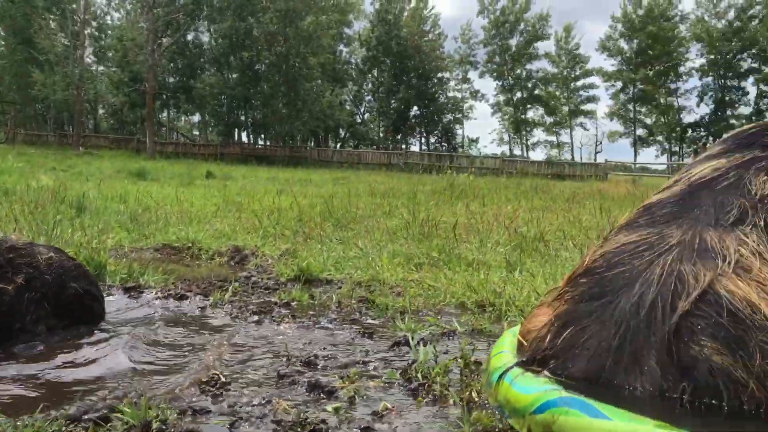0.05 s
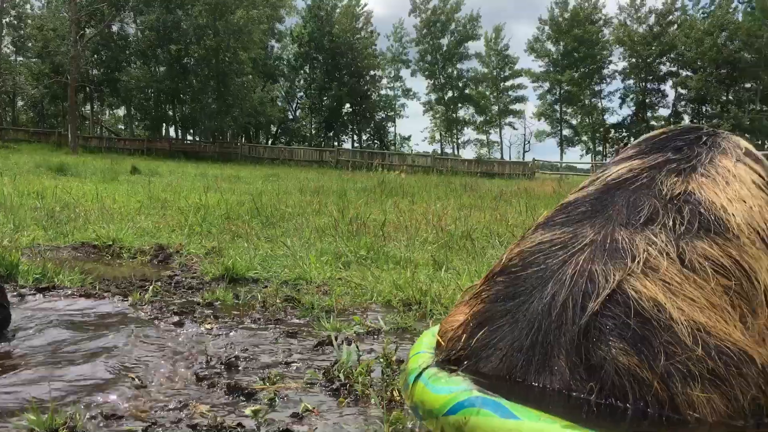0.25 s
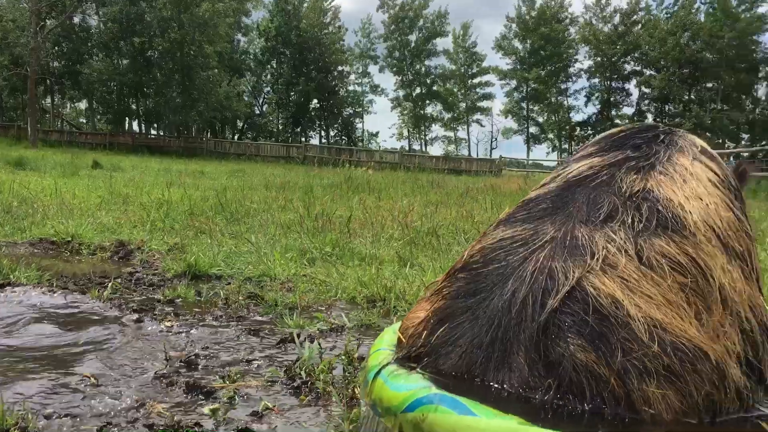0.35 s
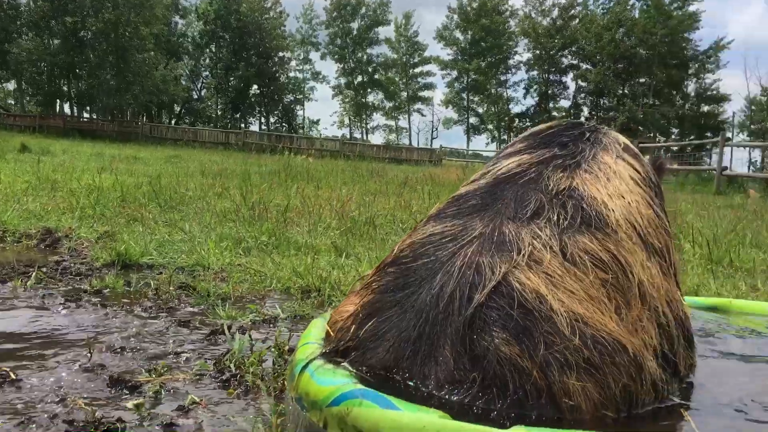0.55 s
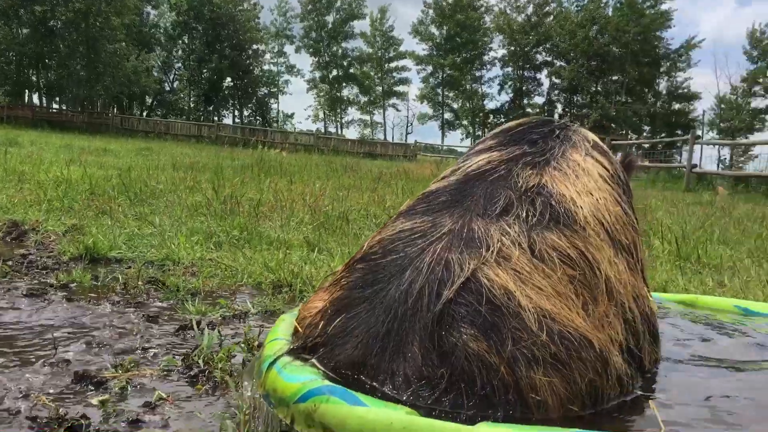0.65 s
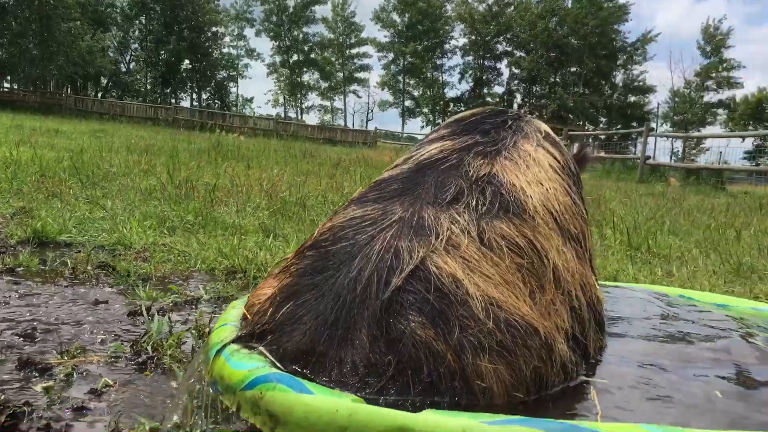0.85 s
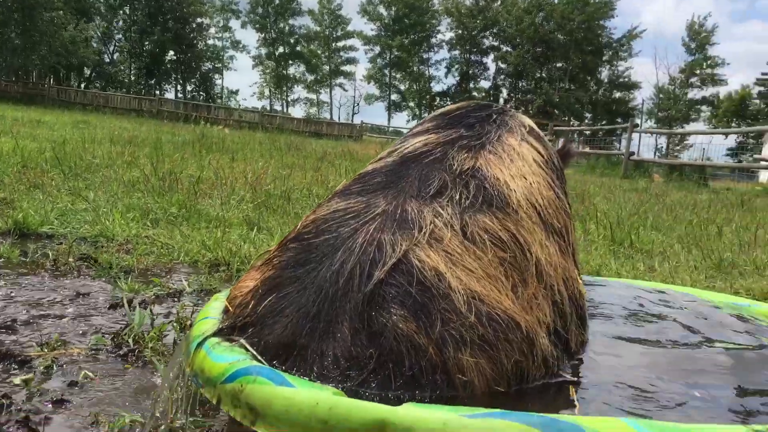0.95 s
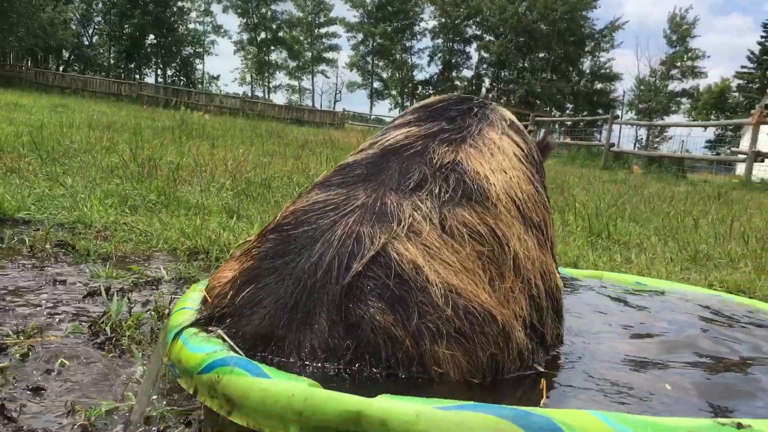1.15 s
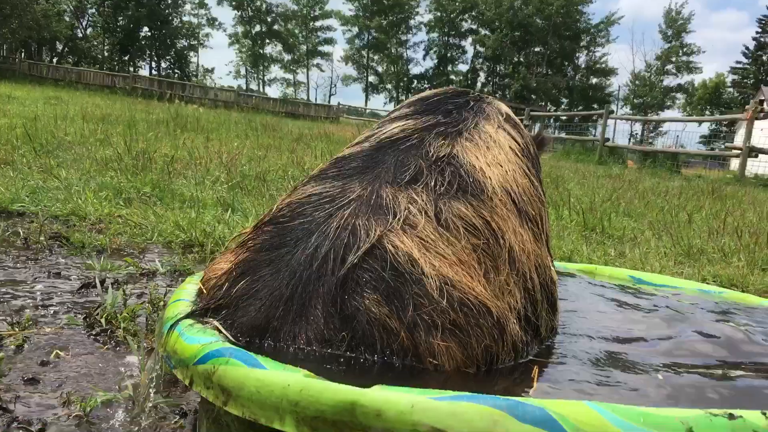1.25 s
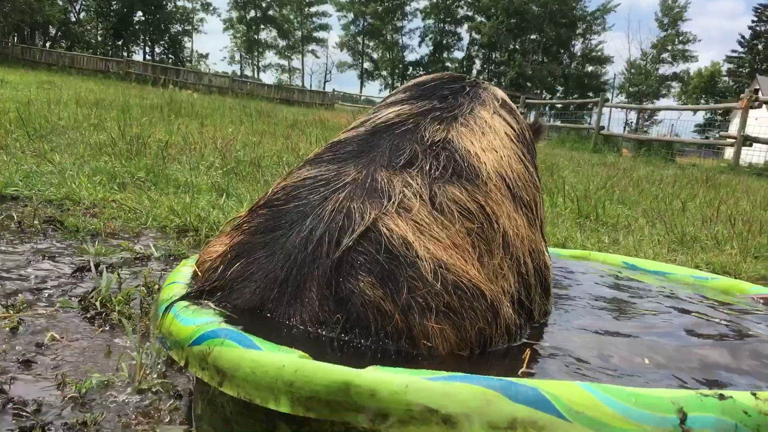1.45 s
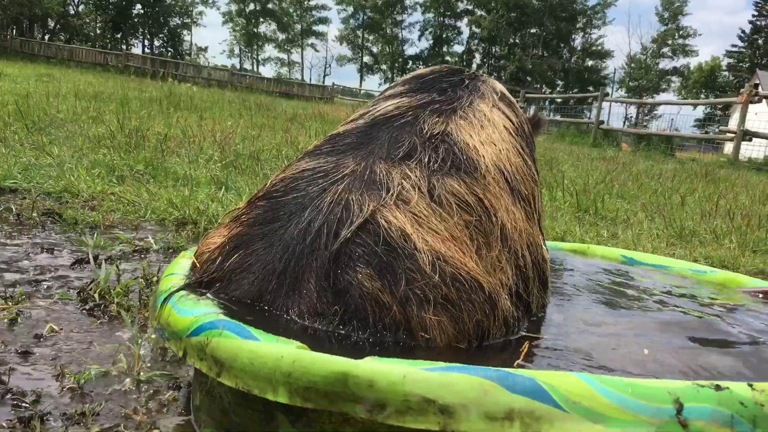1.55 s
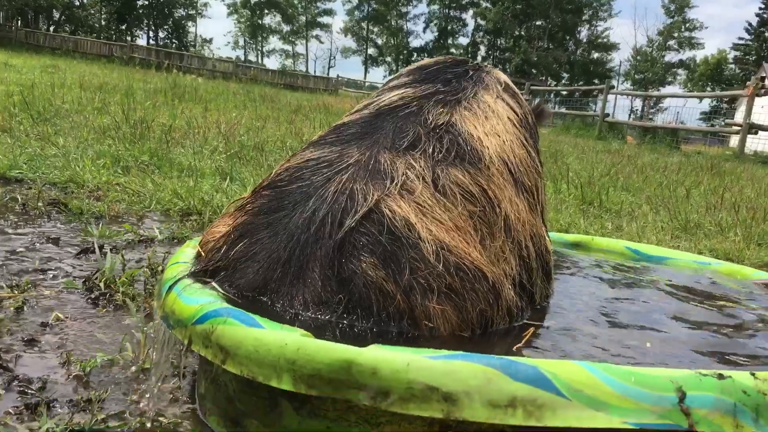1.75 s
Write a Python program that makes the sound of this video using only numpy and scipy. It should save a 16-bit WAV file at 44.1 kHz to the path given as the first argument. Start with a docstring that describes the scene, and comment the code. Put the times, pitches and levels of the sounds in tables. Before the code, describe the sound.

Water sloshing and splashing as a pig shifts in a paddling pool, with drips.

```python
"""Pigs shift in a paddling pool and a mud wallow, close by in an open field.
It opens on light wind rumbling on the microphone, lapping water and a few small bubbles. Near 0.35 s
the first big slop: water slaps, traps gulping air pockets and throws spray that patters back as drops.
A second slop lands at 0.8 s, and a heavy body bumps the soft pool wall. The water eases into drips
and stray bubbles, with one last, softer surge around 1.6 s."""
import sys
import numpy as np
from scipy.fft import rfft, irfft, next_fast_len
from scipy.io import wavfile
from scipy.ndimage import map_coordinates

SR = 44100
rng = np.random.default_rng(int(sys.argv[2]) if len(sys.argv) > 2 else 0)


def wav_record(signal):
    """Record a signal, one row per channel, as 16-bit PCM in the file named by sys.argv[1]."""
    frames = np.transpose(np.atleast_2d(signal))
    bounded = np.clip(frames, -1, 1)
    # unit amplitude maps onto the largest positive 16-bit level
    quanta = np.round(bounded * 32767).astype(np.int16)
    wavfile.write(sys.argv[1], SR, quanta)


N = 79380  # 1.8 s


def amp(db):
    """Decibels to gain."""
    return 10 ** (np.asarray(db) / 20)


def unit(x):
    """Scale to rms 1."""
    return x / np.sqrt(np.mean(x ** 2) + 1e-20)


def add(out, start, sound):
    """Mix a sound in at start seconds."""
    part = out[max(0, round(start * SR)):][:len(sound)]
    part += sound[:len(part)]


def wobble(rate):
    """Smooth random modulation, rate points a second."""
    return map_coordinates(rng.standard_normal(N // 50), [np.arange(N) * rate / SR], mode="mirror")


def filtered(x, response):
    """Filter x by a gain given as a function of Hz."""
    size = next_fast_len(len(x) + 8192)
    return irfft(rfft(x, size) * response(np.fft.rfftfreq(size, 1 / SR)), size)[:len(x)]


def equalised(x, curve):
    """Shape x with an EQ curve of (f/Hz, level/dB) points, at rms 1."""
    freqs, db = np.transpose(curve)
    return unit(filtered(x, lambda hz: amp(np.interp(np.log(hz + 1), np.log(freqs), db))))


def swell(t, attack, decay):
    """Envelope with a soft attack and an exponential tail, peak 1."""
    shape = (1 - np.exp(-t / attack)) ** 2 * np.exp(-t / decay)
    return shape / shape.max()


def rings(rows, attack_share, rough, click_db=-120):
    """Damped tones that glide and waver as they die; the attack is a share of the decay time."""
    out, t = np.zeros(N), np.arange(SR // 6) / SR
    for start, hz, db, decay, glide in rows:
        cycles = np.cumsum(hz * 2 ** (glide * np.minimum(t, 2 * decay))) / SR
        drift = [cycles / 3.75]  # a new random value every 3.75 cycles
        tremor, phase = (rough * map_coordinates(points, drift, mode="mirror")
                         for points in rng.standard_normal((2, 64)))
        envelope = swell(t, attack_share * decay, decay) * (1 + tremor)
        ring = envelope * np.sin(2 * np.pi * cycles + 2 * phase)
        band = filtered(rng.standard_normal(len(t)), lambda f: (f * hz / (f * f + hz * hz)) ** 2)
        click = np.exp(-cycles / 2) * unit(band)
        add(out, start, amp(db) * (ring + amp(click_db) * click))
    return out


def splats(rows, width_octaves, attack_s, crackle_db):
    """Short bursts of tiny impacts, each band-passed around its own centre."""
    out, t = np.zeros(N), np.arange(SR // 10) / SR
    for start, db, centre, decay in rows:
        impacts = rng.standard_normal(len(t)) * amp(crackle_db * np.minimum(wobble(1500)[:len(t)], 2))
        burst = filtered(
            impacts, lambda hz: (1 + np.abs(np.log2((hz + 1) / centre) / width_octaves) ** 4.4) ** -.5)
        add(out, start, amp(db) * swell(t, attack_s, decay) * unit(burst))
    return out


def grains(count, low_hz, high_hz, ring_cycles, spread_db, chirp, samples):
    """A cloud of tiny upward-chirping bubbles of random pitch, life and strength."""
    jitter, pitch, strength, life = rng.random((4, count, 1))
    hz = low_hz * (high_hz / low_hz) ** pitch
    cycles = hz * np.arange(samples) / SR
    age = cycles / (ring_cycles * (.5 + life))  # in decay times
    tone = np.sin(2 * np.pi * cycles * (1 + chirp * np.minimum(age, 10) / 2))
    envelope = np.exp(-age) * (1 - np.exp(-5 * age))
    gain = amp(-spread_db * np.log(np.maximum(strength, .02)))
    start = ((np.arange(count)[:, None] + jitter) * N / count).astype(int)
    return np.bincount((start + np.arange(samples)).ravel(), (gain * envelope * tone).ravel(), N)[:N]


# EQ of the wind on the microphone: f/Hz, level/dB
WIND_EQ = [(15, -17), (45, 1), (90, -3.5), (200, -7.5), (400, -27), (1500, -18.5), (5000, -30.5),
           (15000, -30)]
def wind():
    """The bed: light air over the field, rumbling on the microphone."""
    return amp(-59.5 + 0.67 * wobble(5.94)) * equalised(rng.standard_normal(N), WIND_EQ)


# Surges of water as the pigs shift: t/s, attack/s, decay/s, churn level/dB, spray level/dB
WATER_SURGES = [(.02, 0.02, 0.47, -59, -62), (.225, 0.017, 0.36, -51, -59),
                (0.303, 0.014, 0.1, -47.5, -51.5), (0.359, 0.0097, 0.053, -69, -39),
                (0.55, 0.029, 0.049, -50.5, -48.5), (0.658, 0.013, 0.17, -53.5, -52),
                (.785, 0.022, 0.28, -49, -45.5), (0.938, 0.027, 0.16, -47, -48),
                (1.128, 0.012, 0.81, -69, -55.5), (1.563, 0.013, 0.051, -50, -76),
                (1.648, 0.024, 0.15, -50, -53)]
def surges():
    """Gain envelopes for the churn and the spray: every surge swells and subsides."""
    t, power = np.arange(N) / SR, np.zeros((2, N))
    for start, attack, decay, churn_db, spray_db in WATER_SURGES:
        power += (amp([[churn_db], [spray_db]]) * swell(np.maximum(t - start, 0), attack, decay)) ** 2
    return np.sqrt(power)


# EQ of the churning wash: f/Hz, level/dB
WASH_EQ = [(60, -35), (250, 2), (450, -2), (750, 1.5), (1400, 2), (2200, 9), (3200, -6), (6000, -10.5)]
def slosh(churn_gain, lapping_db=-61):
    """Churning water: a fluttering wash with bubbles gurgling in it, still lapping between surges."""
    wash = unit(equalised(rng.standard_normal(N), WASH_EQ) * amp(3.5 * wobble(130)))
    cloud = grains(1200, low_hz=345.6, high_hz=2440, ring_cycles=2.17, spread_db=3.5,
                   chirp=0.036, samples=2000)
    gurgle = equalised(cloud, [(300, -15.5), (700, -2), (1500, 7.5), (2300, -0.5), (4000, -3)])
    return np.hypot(churn_gain, amp(lapping_db)) * (amp(-1) * wash + amp(-2) * gurgle)


def patter(clump_db=2, clumps_per_s=97):
    """Crackling droplets that land in clumps, at rms 1."""
    cloud = grains(1700, low_hz=2680, high_hz=14800, ring_cycles=1.26, spread_db=5,
                   chirp=0.035, samples=300)
    crackle = equalised(cloud, [(1000, -26), (3000, -0.5), (6000, -2), (9000, 6), (10500, -2), (15000, 1)])
    return unit(crackle * amp(clump_db * wobble(clumps_per_s)))


# EQ of the fizz of falling spray: f/Hz, level/dB
FIZZ_EQ = [(800, 0), (2000, -8.5), (3500, 1), (4900, 0), (6000, 5.5), (9000, -5), (10500, -1),
           (13500, -1.5), (16000, -29)]
def spray(spray_gain):
    """Thrown water falls back as fizz, tinkling bubbles and patter; duller drips go on throughout."""
    fizz = unit(equalised(rng.standard_normal(N), FIZZ_EQ) * amp(3.4 * wobble(160)))
    tinkle = unit(grains(1800, low_hz=3000, high_hz=9880, ring_cycles=6.5, spread_db=4,
                         chirp=0.043, samples=700))
    drips = filtered(patter(), lambda hz: 1 / np.hypot(1, (hz / 8600) ** 2))  # low-pass
    thrown = amp(-3) * fizz + amp(-4.5) * tinkle + amp(-2.5) * patter()
    return spray_gain * thrown + amp(-61.5) * drips


# Soft bumps on the pool wall and the microphone: t/s, f/Hz, level/dB, decay/s, glide/(octaves/s)
SOFT_BUMPS = [(.172, 53.3, -46.5, 0.021, 5.5), (.248, 57.4, -43, 0.011, 1), (.33, 49.3, -47, 0.024, -4),
              (.386, 133, -46, 0.022, 4), (.80, 123, -52, 0.0088, -4), (.8635, 174, -33, 0.0066, -73),
              (1.158, 145, -41.5, 0.0057, -10), (1.29, 51, -46, 0.016, -2), (1.645, 176, -44, 0.0056, 11)]
def bumps():
    """The low end: soft knocks that die away within a few cycles."""
    return rings(SOFT_BUMPS, attack_share=0.21, rough=0.2)


# Drops and spatters landing nearby: t/s, level/dB, centre f/Hz, decay/s
LANDING_DROPS = [(.034, -52, 4300, 0.022), (.0605, -48, 7060, 0.0015), (.386, -38.5, 4500, 0.0066),
                 (.461, -34.5, 4500, 0.00058), (.4615, -36.5, 12200, 0.0016), (.48, -34.5, 4100, 0.0057),
                 (.526, -41.5, 6200, 0.0064), (.5535, -40, 5900, 0.0041), (.5775, -41.5, 7300, 0.011),
                 (.599, -40.5, 6170, 0.0022), (.628, -54, 7100, 0.0044), (.6745, -34, 6800, 0.0016),
                 (.6988, -34, 7800, 0.00066), (.7122, -41, 8000, 0.00039), (.718, -39, 4430, 0.0013),
                 (.789, -35.5, 12900, 0.0024), (.802, -30.5, 10100, 0.0017), (.809, -37.5, 6500, 0.0032),
                 (.846, -39, 3540, 0.0062), (.865, -38.5, 5030, 0.0045), (.876, -38.5, 8500, 0.0044),
                 (1.04, -37, 3200, 0.0025), (1.067, -38, 3220, 0.0036), (1.159, -37, 6300, 0.0016),
                 (1.1835, -33, 8160, 0.0019), (1.316, -45.5, 3560, 0.0068), (1.5255, -43, 4800, 0.0047),
                 (1.657, -40, 3900, 0.0036), (1.7115, -50, 5100, 0.0016), (1.717, -36.5, 4150, 0.0013),
                 (1.736, -39, 4360, 0.0018), (1.792, -40.5, 4500, 0.002)]
def drops():
    """Bright ticks: each drop breaks into tiny impacts of uneven strength."""
    return splats(LANDING_DROPS, width_octaves=0.49, attack_s=0.0001, crackle_db=1.5)


# Slaps of water: t/s, level/dB, centre f/Hz, decay/s
WATER_SLAPS = [(.187, -45, 1520, 0.0025), (.231, -37.5, 1000, 0.0043), (.333, -37, 2320, 0.0057),
               (.372, -31.5, 1210, 0.028), (.414, -28.5, 890, 0.006), (.532, -48.5, 454, 0.038),
               (.788, -39.5, 1370, 0.0038), (.795, -28, 720, 0.0038), (.802, -37, 810, 0.03),
               (.8345, -39, 1600, 0.0012), (.863, -34.5, 1200, 0.0048), (.981, -37.5, 1350, 0.0097),
               (1.021, -64, 1500, 0.0092), (1.641, -48, 650, 0.048), (1.682, -48, 1740, 0.005)]
def slaps():
    """Broad midrange smacks: water hits hide and falls on itself."""
    return splats(WATER_SLAPS, width_octaves=0.82, attack_s=0.00037, crackle_db=0)


# Air pockets and larger bubbles: t/s, f/Hz, level/dB, decay/s, glide/(octaves/s)
AIR_POCKETS = [ (.038, 1816, -44, 0.0038, 104), (.0605, 1940, -41, 0.0021, 27),
               (.0955, 2480, -40, 0.002, 21), (.134, 2220, -38.5, 0.00096, 44),
               (.1645, 568, -48, 0.0044, 11), (.231, 568, -37, 0.011, -3), (.238, 1220, -29, 0.0029, 77),
               (.309, 406, -40.5, 0.003, 7), (.334, 1940, -36.5, 0.0048, 10),
               (.3565, 780, -25, 0.0065, 15.5), (.3775, 1465, -24.5, 0.0021, 6),
               (.3775, 720, -18.5, 0.0018, -61), (.381, 554, -26, 0.0061, -27.5),
               (.3865, 3480, -29, 0.0024, 53), (.391, 768, -22.5, 0.0033, 4),
               (.4165, 2120, -30.5, 0.0042, 8), (.479, 5530, -36, 0.001, 7),
               (.527, 2180, -30.5, 0.0015, 14), (.536, 925, -41.5, 0.0023, 13),
               (.585, 8600, -41.5, 0.0021, 13), (.5985, 5430, -37.5, 0.002, 16),
               (.645, 1090, -43, 0.0043, 5), (.796, 577, -37, 0.013, 4.5), (.805, 1250, -24, 0.001, 9),
               (.834, 1437, -30.5, 0.0028, 14), (.9068, 5930, -31.5, 0.0015, -6),
               (.921, 910, -41.5, 0.0038, 16), (.925, 234, -38, 0.0037, 19), (.985, 420, -33, 0.003, 3),
               (1.0225, 635, -33.5, 0.0032, 32), (1.179, 1180, -41, 0.0049, 77.5),
               (1.245, 634, -42.5, 0.0027, -10), (1.293, 670, -47, 0.0061, 14.5),
               (1.4635, 1310, -41.5, 0.0029, 79), (1.471, 3350, -41, 0.0023, 16),
               (1.586, 730, -43.5, 0.0029, -8), (1.603, 620, -43, 0.0052, 7),
               (1.613, 369, -44.5, 0.0054, 36), (1.7305, 660, -38, 0.0026, -7),
               (1.74, 1490, -42, 0.0037, 17), (1.763, 1940, -42, 0.0021, 42)]
def gulps():
    """Trapped air pinches off with a wet click and rings unsteadily in the muddy water."""
    return rings(AIR_POCKETS, attack_share=0.6, rough=0.26, click_db=-12)


def scene():
    """Mono mix of water, bumps and wind, in the open with no echo."""
    churn_gain, spray_gain = surges()
    hits = slaps() + drops() + gulps() + bumps()
    return (hits + slosh(churn_gain) + spray(spray_gain) + wind())[None]


def record(dry, top_hz=15900):
    """A brick-wall high cut on the whole mix."""
    return filtered(dry[0], lambda hz: hz < top_hz)[None]


dry = scene()
out = record(dry)
wav_record(out)
```